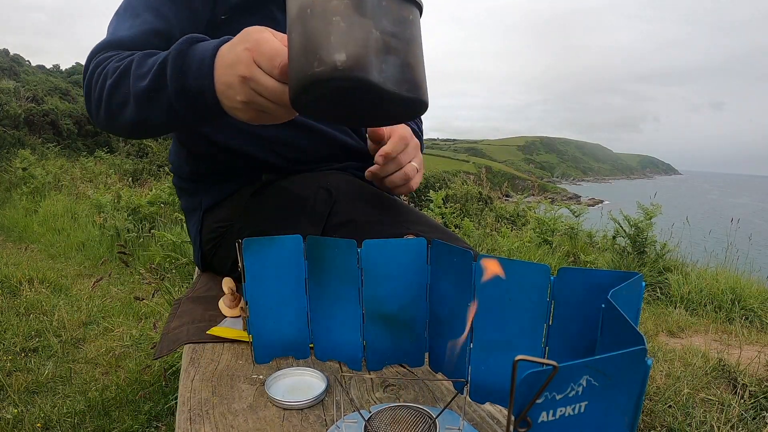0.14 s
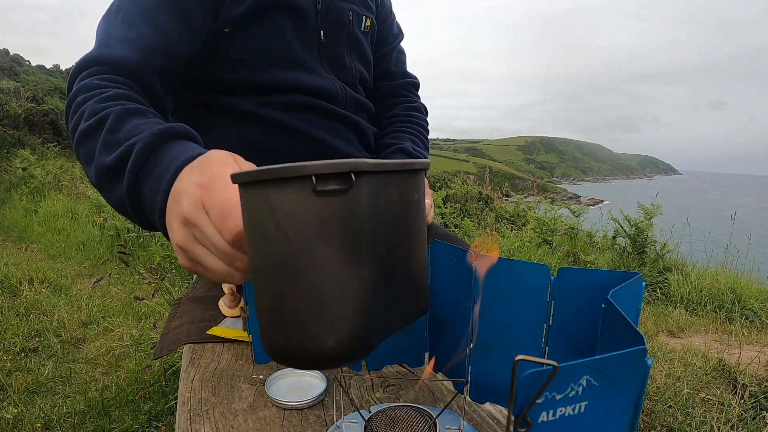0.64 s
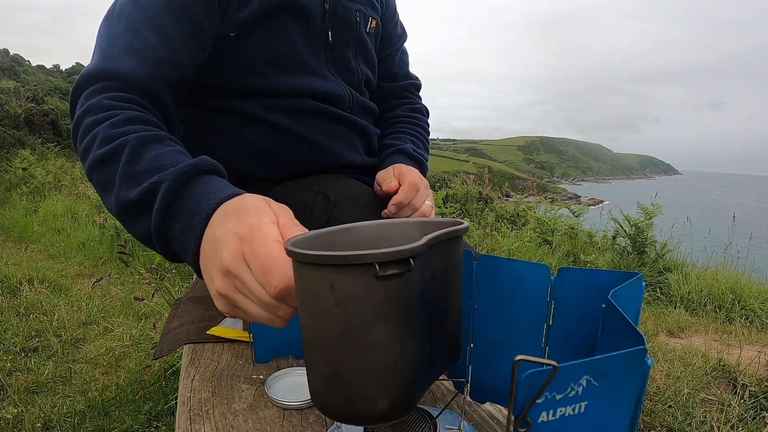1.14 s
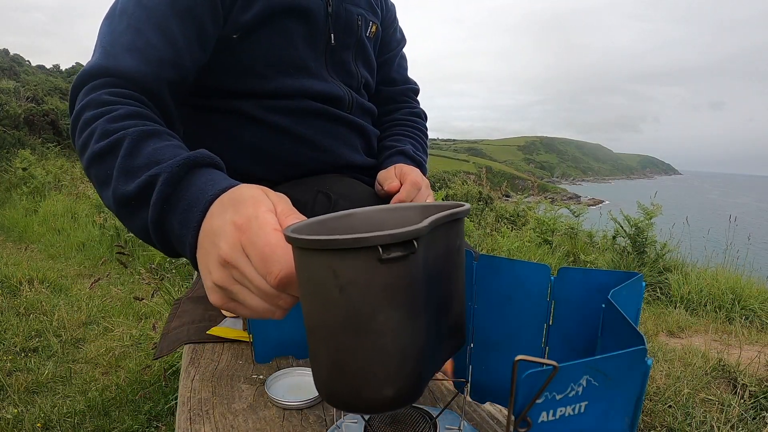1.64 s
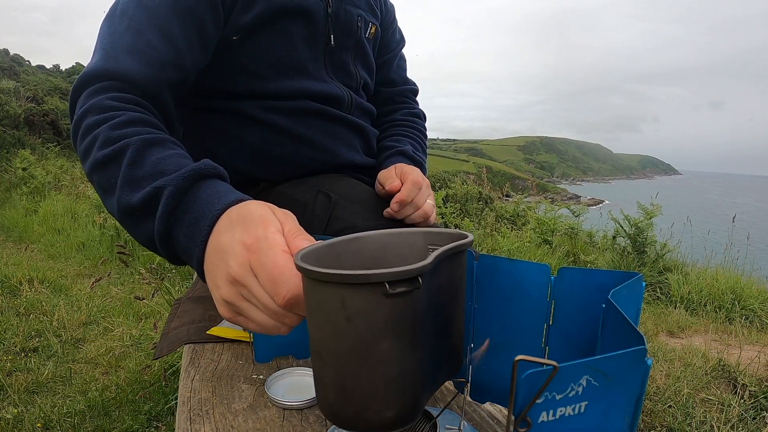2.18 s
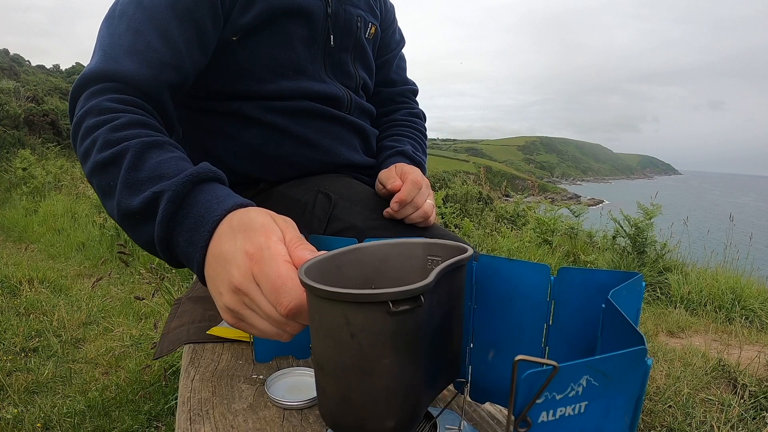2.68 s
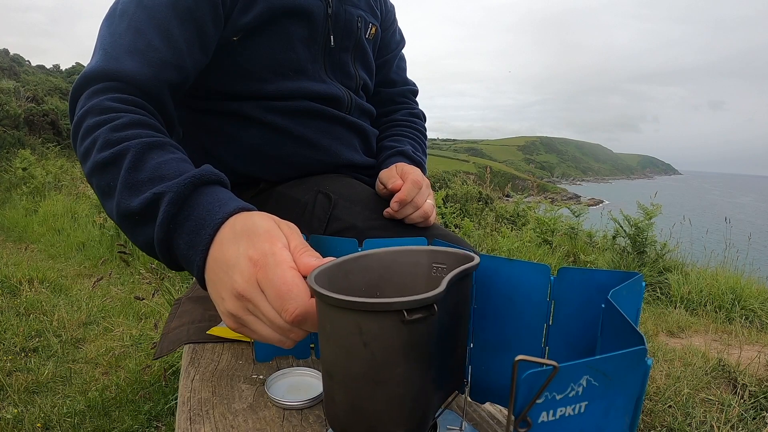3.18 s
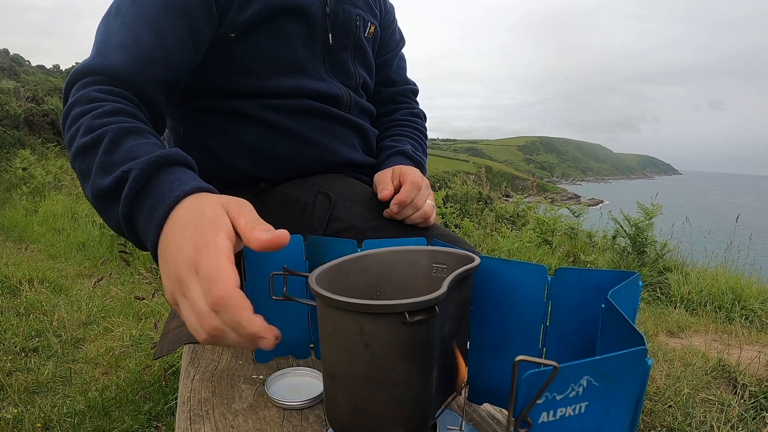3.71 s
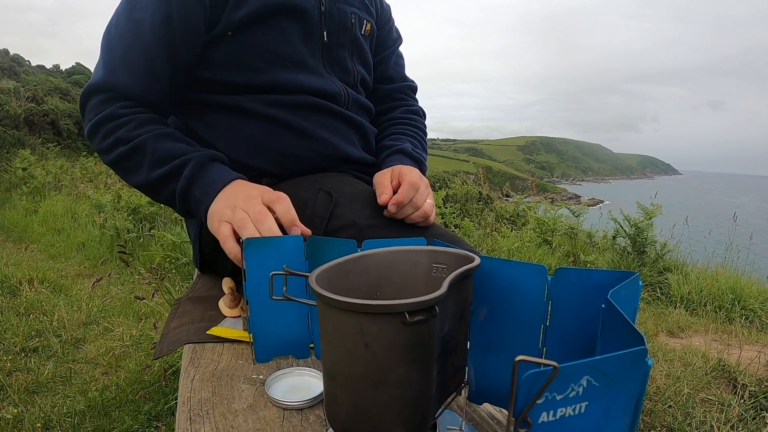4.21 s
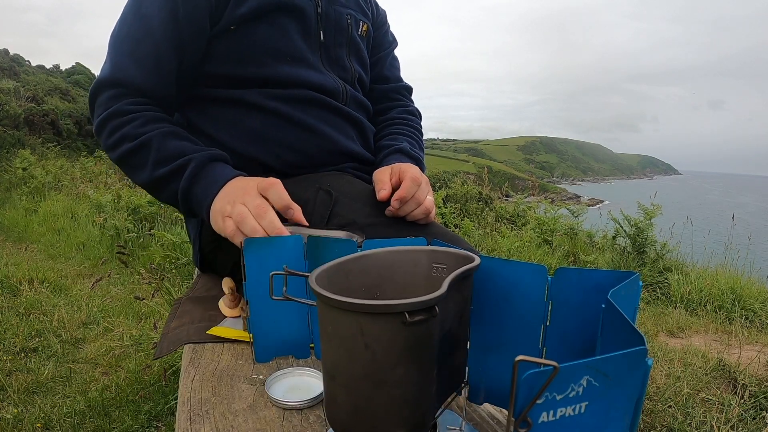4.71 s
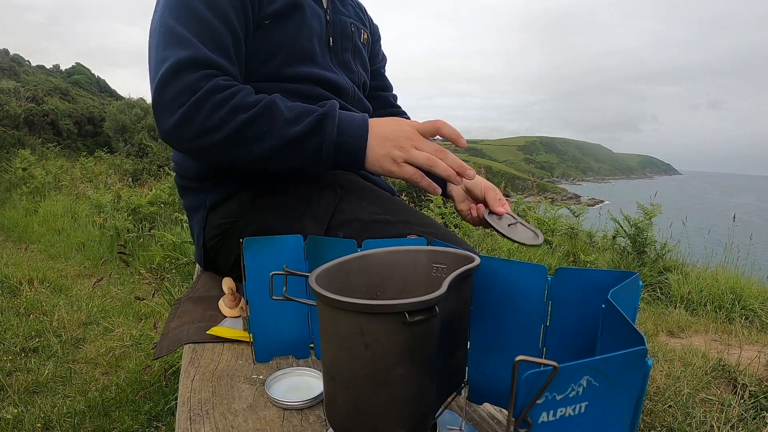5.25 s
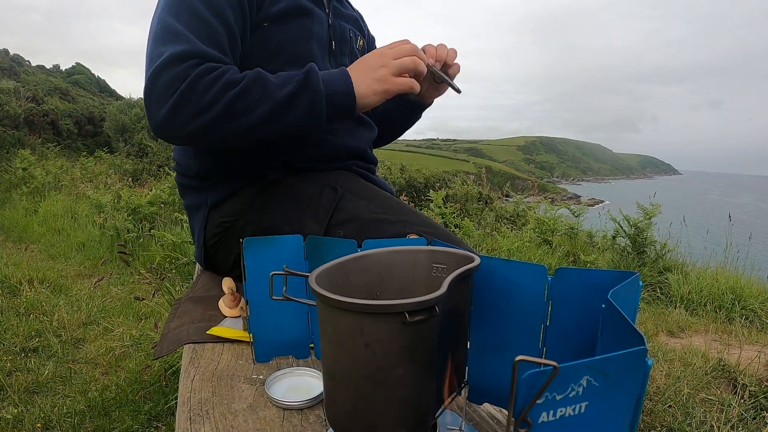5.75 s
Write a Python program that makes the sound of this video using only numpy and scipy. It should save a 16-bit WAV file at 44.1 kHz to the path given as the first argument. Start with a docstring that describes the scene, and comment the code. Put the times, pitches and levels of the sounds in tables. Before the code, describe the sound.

Outdoors on a cliff top, a small stereo microphone sits close to a camp stove. A steady soft flame roar with faint gas hiss and far surf runs throughout, quiet and slightly patchy. From 0.2 to 0.85 seconds a metal mug is lowered: short rising water gulps around 900 hertz, damped wire-handle ticks and grainy rubbing. From 1 to 3 seconds little happens beyond the burner, light low wind and thin gliding bird notes at 7 to 8 kilohertz, the last near 3.6. At 3.1 to 3.45 the mug ticks and scrapes dryly onto its supports. Wind surges briefly at 3.05, then from 3.5 onward buffets heavily in deep, uneven thumps, strongest near 3.75 and often heavier on the right. At 4.44 to 4.75 a thin lid clatters in a rapid, short-ringing cluster, the loudest metal event. Fingers hiss on it around 5.1 to 5.7, and a small clear nail tick of about 3 kilohertz comes at 5.79.

```python
"""A steel mug of water, close to the microphone, is lowered onto a gas stove on a grassy cliff top: air pockets
gulp, wire handles tick, and struck metal modes with chattering bounces make the scrape onto the supports.
Then a thin lid is picked up with a clatter, rubbed in the fingers (grainy hiss) and ticked with a nail.
Burner and far surf are patchy stereo noise, a small bird calls in gliding tones, and gusts of slow and
fast noise buffet the two microphone ports of a small camera."""
import sys
import numpy as np
from scipy import signal
from scipy.fft import rfft, irfft, next_fast_len
from scipy.io import wavfile
from scipy.ndimage import uniform_filter1d, map_coordinates

SR = 44100
rng = np.random.default_rng(int(sys.argv[2]) if len(sys.argv) > 2 else 0)


def transcribe(signal):
    """Save signal, clipped to [-1, 1], as a 16-bit WAV file at the path in sys.argv[1]."""
    frames = np.atleast_2d(signal).T
    limited = np.clip(frames, -1, 1)
    pcm = np.round(limited * 32767).astype(np.int16)
    wavfile.write(sys.argv[1], SR, pcm)


def makeup_ratio(level_db):
    """Linear amplitude ratio for a level in decibels (20 dB per factor of ten)."""
    decades = np.asarray(level_db, float) / 20
    return 10 ** decades


N = 258867
TIME = np.arange(N) / SR

# Burner and surf over time. Each row: time in seconds, relative roar level in dB, relative gas hiss level in dB.
HISS_LEVELS = [(0.0, -53, -68), (.6, -51.5, -68), (1.83, -51, -68.5), (5.87, -53, -69.5)]
# Spectra of the flame roar with surf, and of the gas jet. Each row: frequency in Hz, density in dB per Hz.
ROAR_SPECTRUM = [(71, -38), (120, -2.5), (210, -1), (350, -5.5), (400, -6.5), (436, -8.5), (484, -8),
                 (1560, -10.5), (4000, -26), (5200, -49.5), (8800, -120)]
GAS_SPECTRUM = [(1470, -12.5), (2500, -5), (2740, -4.5), (3360, -10), (3700, -10.5), (5070, -13.5),
                (5640, -14.5), (7850, -24.5), (8300, -28.5), (10800, -79.5), (18300, -120)]
# How alike the hiss is at both ports. Each row: frequency in Hz, likeness from 0 to 1.
HISS_LIKENESS = [(200, 0.957), (2000, 0.888), (4000, 0.99), (7000, 0.22)]
# Colour of the two ports. Each row: frequency in Hz, left over right in dB.
PORT_COLOUR = [(200, -0.93), (1500, -1.5), (2900, 0), (4000, -1), (5200, -3.5), (6900, -13), (7900, 1.5)]

# Bird notes. Each row: start in seconds, length in seconds, first and last pitch in Hz, level in dB.
BIRD_NOTES = [(0, 0.095, 8160, 7600, -75.5), (.37, 0.177, 7150, 7085, -79), (0.831, 0.103, 7500, 7510, -77),
              (0.952, 0.039, 8200, 7770, -69.5), (.99, 0.059, 7900, 7720, -69),
              (1.333, 0.07, 7250, 7250, -74), (1.399, 0.0376, 7350, 7540, -74.5),
              (1.715, 0.036, 7850, 7520, -67.5), (1.745, 0.031, 7850, 7250, -67),
              (1.774, .035, 7600, 7350, -73), (2.119, 0.11, 7160, 7000, -74),
              (2.469, 0.093, 7800, 7480, -73), (2.88, 0.091, 7820, 7597, -71.5),
              (2.971, 0.054, 7400, 7300, -73.5), (3.553, 0.133, 7060, 7100, -69.5)]

# Spectra of the slow and the fast eddies. Each row: frequency in Hz, density in dB per Hz.
SLOW_EDDIES = [(8.8, -33), (15, -2.5), (59, 1), (120, -11.5), (160, -35), (260, -120)]
FAST_EDDIES = [(65, -46.5), (110, 0), (174, -5.5), (339, -26), (420, -29), (550, -46), (920, -120)]
# Gusts on the ports. Each row: peak in seconds, time to sink by GUST_SINK_DB in seconds (at zero the gust is silent),
# slow eddies on the left and on the right port in dB, fast eddies on the exposed right port in dB.
GUST_PEAKS = [(.025, 0.09, -47.5, -58.5, -67.5), (.47, 0.36, -58, -62, -65.5),
              (1.71, 0.02, -44, -42, -71.5), (1.89, 0.09, -49.5, -54, -70),
              (2.06, .14, -46.5, -53.5, -66.5), (2.46, 0.0341, -48.5, -43, -70),
              (2.57, 0.0947, -42.5, -44, -67), (2.78, 0.0645, -42.5, -60, -64.5),
              (3.048, 0.0376, -21, -25.5, -37.5), (3.178, 0.1681, -45, -35.5, -54.5),
              (3.547, 0.0526, -26, -18.5, -33), (3.69, .08, -31.5, -31.5, -43),
              (3.734, 0.0822, -30.5, -25, -20.5), (3.78, 0.0605, -36.5, -14.5, -19.5),
              (3.881, 0.05, -33, -17.5, -26), (3.981, 0.1025, -24, -19, -31),
              (4.085, 0.12, -21.5, -21, -33), (4.195, 0.1814, -33.5, -34, -32),
              (4.315, 0.0655, -27, -19, -28.5), (4.395, 0.1367, -32, -31.5, -40),
              (4.595, 0.05, -43, -28.5, -42.5), (4.665, 0.0579, -26, -41.5, -58),
              (4.699, 0.0247, -49.5, -20.5, -32), (4.755, 0, -37, -53, -57.5),
              (4.819, 0.0937, -37.5, -23, -29), (4.885, 0.1166, -35, -18, -26),
              (4.953, 0.0551, -27.5, -22, -30), (5.103, 0.1, -39, -32.5, -54),
              (5.198, 0.0559, -25, -20, -37), (5.288, .09, -39.5, -45.5, -58.5),
              (5.373, .07, -49.5, -27, -37.5), (5.488, 0.06, -40.5, -54.5, -62),
              (5.652, 0.0735, -28.5, -18.5, -38), (5.737, 0.14, -30, -23, -29.5),
              (5.83, 0.0762, -30, -40.5, -59)]
# Breeze between the gusts, slow and fast eddies. Each row: time in seconds, level in dB.
BREEZE_SLOW = [(0, -75.5), (1.0, -69.5), (1.5, -73), (2.95, -68.5), (3.1, -59.5), (3.45, -62), (3.6, -37),
               (4.4, -40), (4.52, -53.5), (5.87, -50.5)]
BREEZE_FAST = [(0, -77.5), (2.95, -76), (3.5, -66.5), (5.87, -64.5)]

# Fingers and wire sliding on metal. Each row: start in seconds, length in seconds, first and last level in dB.
RUB_STROKES = [(.05, 0.218, -76, -68.5), (.245, .125, -62, -76), (0.361, 0.126, -60.5, -63),
               (0.492, 0.344, -73, -74), (0.798, 0.19, -74, -81.5), (3.184, .25, -67, -76),
               (3.428, 0.167, -68.5, -73), (4.59, .075, -55, -62), (5.095, 0.085, -62, -56),
               (5.164, 0.1593, -65.5, -71.5), (5.385, 0.053, -68, -71.5), (5.501, .18, -71, -73),
               (5.766, 0.061, -67.5, -72.5)]
# Spectrum of the rubbing. Each row: frequency in Hz, density in dB per Hz.
RUB_SPECTRUM = [(1500, -39.5), (3500, 3), (5000, 1), (7200, -1), (9000, -2), (14000, -7.5)]

# Contacts of mug, handles and supports, then of the lid. Each row: start in seconds, nominal peak in dB,
# favoured mode in Hz, contact time in seconds, brightness in dB per octave.
MUG_HITS = [(.2025, -50, 2730, 0.0056, 2), (.365, -47.5, 1900, 0.0058, 1.5), (.45, -42.5, 2320, 0.0039, -1),
            (.4665, -53.5, 6340, 0.0031, 0.5), (.5, -44, 2720, 0.0062, -3.5),
            (.545, -44, 2700, 0.0063, -3.5), (.6175, -39, 2750, 0.0053, -3.5),
            (.619, -43.5, 1362, 0.0048, -0.5), (.638, -52.5, 2730, .004, -2), (.75, -49, 2720, .006, -4),
            (.7885, -42, 2800, 0.0068, -1), (3.1215, -35, 5080, 0.0176, 0.5), (3.141, -38, 5080, .011, 3),
            (3.146, -37, 4400, 0.0059, 0), (3.1555, -36.5, 6700, .003, 0.5),
            (3.1575, -27.5, 2200, 0.0066, 1.5), (3.167, -40, 2050, 0.0054, 1.5),
            (3.333, -48, 4400, 0.0144, 1.5), (3.366, -33, 3050, 0.0032, -0.5),
            (3.378, -40, 1900, 0.0153, -1), (3.442, -41, 1900, 0.03, -2.5)]
LID_HITS = [(4.4432, -20, 1084, 0.00416, 2), (4.444, -20.5, 670, 0.0028, 1),
            (4.4535, -18.5, 646, 0.00723, 1.5), (4.454, -25, 3860, 0.005, 0), (4.508, -38, 2000, 0.0127, 1),
            (4.5215, -19.5, 501, 0.0038, .5), (4.522, -24, 2738, 0.0035, 0.5),
            (4.53, -25.5, 442, 0.0136, -0.5), (4.576, -17, 940, 0.00515, -1),
            (4.5775, -25.5, 2480, 0.004, -0.5), (4.5865, -19, 662, 0.0044, 0.5),
            (4.6285, -28.5, 661, 0.0148, -3), (4.6275, -34, 1834, 0.01205, -0.5),
            (4.686, -26, 2033, 0.0159, -2), (4.689, -28.5, 560, .005, -3), (4.702, -21, 590, 0.01945, -2.5),
            (4.7362, -19.5, 2738, .003, -1.5), (4.738, -29, 1375, .005, 0), (4.739, -30.5, 760, .01, 0)]
# Ringing modes of mug and lid. Each row: frequency in Hz, relative level in dB, 60 dB decay time in seconds.
MUG_MODES = [(1362, -13.5, 0.02), (1900, -2, 0.034), (2076, -1.5, 0.027), (2320, -2.5, 0.018),
             (2730, -3, 0.0187), (3378, -6.5, 0.044), (3860, -9, 0.04), (4400, -8, 0.022),
             (5080, -8.5, 0.021), (6340, -7.5, .02), (6750, -14, .02), (7300, -13.5, 0.02)]
LID_MODES = [(431, -7, 0.062), (491.8, -1, 0.065), (602.4, 5.5, 0.0407), (655.5, 5, 0.045),
             (760, 2, 0.0396), (1084, -5, .12), (1375, -10, 0.24), (1834, -6, .075), (2033, -5, .07),
             (2738, 3.5, 0.0325), (3050, -4, 0.036), (3236, -10.5, 0.109), (3510, -14, .14),
             (3860, -3, 0.05), (4270, -11.5, 0.11), (4640, -10, 0.09), (5000, -11, .06), (5550, -16.5, .06),
             (6294, -17, 0.07), (6620, -19, .05), (7196, -20, .06)]
# Noise of the blow itself. Each row: frequency in Hz, density in dB per Hz.
CRACK_SPECTRUM = [(300, -26.5), (500, 0), (1100, 1.5), (1600, -1.5), (2700, -1), (4000, -5.5), (7000, -16),
                  (14000, -20)]

# Water gulps. Each row: start in seconds, relative level in dB, starting pitch in Hz.
GULPS = [(0.204, -42, 960), (0.261, -48, 1003), (0.354, -47, 756), (0.366, -45, 853), (0.45, -37, 860),
         (0.502, -37, 852), (0.55, -42, 932), (0.618, -42.5, 1002), (0.642, -41, 914), (0.713, -48, 927),
         (0.731, -45, 900), (0.751, -41, 848), (0.785, -46.5, 905), (0.83, -47, 977)]
# A fingernail ticks the rim of the held lid. Each row: start in seconds, level in dB.
TINKS = [(5.7808, -42), (5.786, -31.5), (5.7935, -41)]
# Left port behind the right for the kit. Each row: frequency in Hz, lag in radians.
KIT_LAG = [(700, 0), (2000, 0.304), (4000, 1.07), (5200, 0.56), (6900, 0.034), (8000, 0.88)]
# Treble loss behind the port mesh. Each row: frequency in Hz, gain in dB.
MESH_LOSS = [(7300, 0), (8500, -8.5), (11000, -13), (14000, -28), (16500, -64)]


def unit(x):
    """Scaled to rms 1."""
    return x / np.sqrt(np.mean(x ** 2) + 1e-20)


def along(points, hz):
    """(Hz, value) points joined on a log frequency axis."""
    f, v = np.transpose(points)
    return np.interp(np.log(hz + 1), np.log(f + 1), v)


def curves(rows):
    """One value per sample for each column after the time."""
    s, *cols = np.transpose(rows)
    return [np.interp(TIME, s, c) for c in cols]


def wobble(rate):
    """A smooth random curve, rate knots a second."""
    return map_coordinates(rng.standard_normal(int(N * rate / SR) + 4), [TIME * rate])


def window(s, length, rise_s, fall_s):
    """A smooth gate from s to s + length."""
    ramp = np.minimum((TIME - s) / rise_s, (s + length - TIME) / fall_s)
    return np.sin(np.pi / 2 * np.clip(ramp, 0, 1)) ** 2


def filtered(x, response):
    """x times a complex response of frequency."""
    n = x.shape[-1]
    m = next_fast_len(n + 8192)
    return irfft(rfft(x, m) * response(np.fft.rfftfreq(m, 1 / SR)), m)[..., :n]


def noise(spectrum, channels=1):
    """Coloured noise of rms 1."""
    return unit(filtered(rng.standard_normal((channels, N)), lambda hz: makeup_ratio(along(spectrum, hz))))


def diffuse(spectrum, patchy_db):
    """Stereo noise in soft patches of time and frequency, partly alike at both ports."""
    z = signal.stft(rng.standard_normal((2, N)), nperseg=512)[2]
    field = uniform_filter1d(rng.standard_normal(z.shape[1:]), size=8, axis=0)
    field = uniform_filter1d(field, size=14, axis=1)
    pair = signal.istft(z * makeup_ratio(patchy_db * unit(field)), nperseg=512)[1][:, :N]

    def spread(hz):
        # this mid/side balance gives the wanted left-right correlation
        angle = np.arccos(np.clip(along(HISS_LIKENESS, hz), -1, 1)) / 2
        return makeup_ratio(along(spectrum, hz)) * np.array([np.cos(angle), np.sin(angle)])

    mid, side = filtered(pair, spread)
    return unit(np.array([mid + side, mid - side]))


def burner():
    """Flame roar with far surf, and the gas jet above it, both fluttering a little."""
    roar_db, gas_db = curves(HISS_LEVELS)
    roar_gain = makeup_ratio(roar_db + 2.5 + .5 * wobble(7))
    gas_gain = makeup_ratio(gas_db + 7.0 + 0.31 * wobble(12))
    roar = roar_gain * diffuse(ROAR_SPECTRUM, patchy_db=1.1347)
    return roar + gas_gain * diffuse(GAS_SPECTRUM, patchy_db=1.05)


def bird():
    """Thin high notes that waver as they glide, blurred by the bushes' echoes, which differ at each port."""
    edge_s, echo_db, echo_t60_s = 0.013, -2.5, .12
    out = np.zeros(N)
    for s, length, first_hz, last_hz, db in BIRD_NOTES:
        hz = np.interp(TIME, [s, s + length], [first_hz, last_hz])
        gain = window(s, length, edge_s, edge_s) * makeup_ratio(db + 3.84 * wobble(70))
        phase = 2 * np.pi * np.cumsum(hz + 80 * wobble(120)) / SR
        out += gain * np.sqrt(2) * np.sin(phase)
    t = np.arange(SR // 5) / SR
    tail = rng.standard_normal((2, len(t))) * makeup_ratio(-60 * t / echo_t60_s)
    echo = signal.fftconvolve(out[None], tail / np.linalg.norm(tail[0]), axes=1)[:, :N]
    return out + makeup_ratio(echo_db) * echo


GUST_SINK_DB = 21


def gusts():
    """Each gust swells to a rounded peak and sinks into the breeze; powers add to left, right and fast dB."""
    roundness, rise_over_fall, fast_over_slow = 1.392, 0.916, 0.786  # higher power: rounder top; time ratios
    step = np.arange(0, N / SR + .01, .002)
    s, span, *peak_db = np.transpose(GUST_PEAKS)[:, :, None]
    away = np.abs(step - s) / np.where(step < s, rise_over_fall * span, span)
    levels = []
    for db, brief, floor in zip(peak_db, [1, 1, fast_over_slow], [BREEZE_SLOW, BREEZE_SLOW, BREEZE_FAST]):
        gust_db = db - GUST_SINK_DB * (away / brief) ** roundness
        breeze_db = np.interp(step, *np.transpose(floor))
        power = np.sum(makeup_ratio(2 * gust_db), axis=0) + makeup_ratio(2 * breeze_db)
        levels.append(np.interp(TIME, step, 10 * np.log10(power)))
    return levels


def steady(x, span_s):
    """Noise with its own slow swells evened out."""
    return x / np.sqrt(np.abs(uniform_filter1d(x ** 2, round(span_s * SR))) + 0.044)


def wind():
    """Eddies hit each port on its own; fast eddies come in lumps and stand out in strong gusts."""
    left_db, right_db, fast_db = gusts()
    slow_db = np.array([left_db, right_db])
    # on the sheltered left port the fast eddies follow its slow ones
    fast_db = np.array([-42.5 + 1.045 * (left_db + 28.0), fast_db])
    lumps = np.array([wobble(30), wobble(30)])
    slow = steady(noise(SLOW_EDDIES, channels=2), span_s=0.095)
    fast = unit(makeup_ratio(2.0 * lumps) * steady(noise(FAST_EDDIES, channels=2), span_s=0.068))
    deep = filtered(slow, lambda hz: 1 / (1 + (hz / 45) ** 4))
    lull = makeup_ratio(np.clip(-.25 * (slow_db + 30.0), -6, 6))  # light wind rolls slower eddies
    slow = slow + (lull - 1) * deep
    return makeup_ratio(slow_db) * slow + makeup_ratio(fast_db) * fast


def rubbing():
    """Sliding skin and wire catch and slip: a hiss in clumps and grains, coloured by the metal's upper modes."""
    edge_s, ring_db, ring_width_hz = 0.0137, 4, 90
    level = np.zeros(N)
    for s, length, first_db, last_db in RUB_STROKES:
        stroke_db = np.interp(TIME, [s, s + length], [first_db, last_db])
        level += makeup_ratio(stroke_db) * window(s, length, edge_s, edge_s)
    grain = makeup_ratio(2 * wobble(45) + 3 * wobble(400))  # clumps and grains

    def metal(f):
        damping = 1j * f * ring_width_hz
        modes = LID_MODES[-8:] + MUG_MODES[-2:]
        return 1 + makeup_ratio(ring_db) * sum(damping / (hz ** 2 - f ** 2 + damping) for hz, _, _ in modes)

    return level * unit(filtered(grain * noise(RUB_SPECTRUM)[0], metal))


def struck(hits, modes, crack_db, favour_db, tail_s, low_hz):
    """A blow and its chatter of small bounces ring the modes; where it lands decides which mode is favoured."""
    blow_s, scrape_s = 3e-5, .011  # contacts longer than scrape_s start without a blow and swell
    chatter_at_10ms_db, chatter_per_doubling_db = 1, 7.5  # bounces over the first blow
    out, t = np.zeros(N + SR), np.arange(SR // 5) / SR
    hz, level_db, t60 = np.transpose(modes)[:, :, None]
    push = np.exp(-t[:SR // 200] / blow_s)  # the contact force takes a moment, so a ring starts without a click
    for s, db, favoured_hz, contact_s, tilt_db in hits:
        tilt = lambda f: tilt_db * np.log2(f / 1500 + .01)
        near = lambda f: np.exp(-(np.log2(f / favoured_hz + .01) / .2) ** 2)
        scatter_db = 2 * rng.standard_normal(hz.shape)
        strength = makeup_ratio(level_db + tilt(hz) + favour_db * near(hz) + scatter_db)
        held_hz = hz * (1 + .005 * rng.standard_normal(hz.shape))  # fingers detune the metal
        stroke = np.sum(strength * makeup_ratio(-60 * t / t60) * np.sin(2 * np.pi * held_hz * t), axis=0)
        span = max(contact_s, .001)
        chatter_db = chatter_at_10ms_db + chatter_per_doubling_db * np.log2(100 * span)
        # bounces: spiky noise that keeps up for the contact, then stops
        bounces = rng.laplace(size=len(t)) * np.exp(-(t / span) ** 4)
        force = makeup_ratio(chatter_db) * bounces / np.sqrt(2 * span * SR)
        scrape = span > scrape_s
        force *= 1 - scrape * np.exp(-t / (.06 * span))
        force[0] = 1 - scrape
        ring = signal.fftconvolve(np.convolve(force, push), stroke)[:len(t)]
        # the countless small modes of thin metal merge into a noise that each bounce feeds
        fed = np.abs(signal.fftconvolve(force ** 2, makeup_ratio(-120 * t / tail_s))[:len(t)])
        grit = rng.standard_normal(len(t)) * np.sqrt(fed)
        colour = lambda f: makeup_ratio(along(CRACK_SPECTRUM, f) + tilt(f) + favour_db / 2 * near(f))
        crack = filtered(grit, colour)
        # from nominal peak to rms
        out[round(s * SR):][:len(t)] += makeup_ratio(db - 16) * unit(unit(ring) + makeup_ratio(crack_db) * unit(crack))
    # too small to radiate bass
    return filtered(out[:N], lambda f: (1j * f / low_hz / (1 + 1j * f / low_hz)) ** 4)


def water():
    """Air pockets gulp in the sloshing water: short damped tones that rise."""
    t60_s, onset_s = 0.0268, 0.00112
    out, t = np.zeros(N + SR), np.arange(SR // 20) / SR
    for s, db, hz in GULPS:
        tone = np.sin(2 * np.pi * hz * t * (1 + 8 * t))
        out[round(s * SR):][:len(t)] += makeup_ratio(db + 7.5 - 60 * t / t60_s) * (1 - np.exp(-t / onset_s)) * tone
    return out[:N]


def tinks():
    """Each light tick rings only the one mode that the fingers leave free."""
    mode_hz, t60_s = 3003, 0.0286
    out, t = np.zeros(N + SR), np.arange(SR // 20) / SR
    for s, db in TINKS:
        hz = mode_hz * (1 + 0.0095 * rng.standard_normal())
        decay = makeup_ratio(db - 60 * t / t60_s) * (1 - np.exp(-t * mode_hz))
        out[round(s * SR):][:len(t)] += decay * np.sin(2 * np.pi * hz * t)
    return out[:N]


def nearby(x, echo_db):
    """Board and wind shield send back short, treble-weighted echoes, different at each port."""
    t = np.arange(SR // 30) / SR
    tail = rng.standard_normal((2, len(t))) * makeup_ratio(-60 * t / 0.013)
    echo = signal.fftconvolve(x[None], tail / np.linalg.norm(tail[0]), axes=1)[:, :N]
    return x + makeup_ratio(echo_db) * filtered(echo, lambda f: f ** 2 / (f ** 2 + 3500 ** 2))


def ports(x, radians):
    """A sound reaches the left port later; each port has its colour."""
    side = np.array([[.5], [-.5]])
    return filtered(x, lambda hz: makeup_ratio(side * along(PORT_COLOUR, hz)) * np.exp(-1j * side * radians(hz)))


def scene():
    """Kit close in front, hiss and bird to one side, wind on the ports."""
    far = ports(burner(), lambda hz: 2 * np.pi * hz * 6.5e-5)  # left port late by 65 microseconds
    far = far + ports(bird(), lambda hz: 2 * np.pi * hz * 2e-5)
    mug = struck(MUG_HITS, MUG_MODES, crack_db=4, favour_db=13.5, tail_s=0.0306, low_hz=787)
    lid = struck(LID_HITS, LID_MODES, crack_db=-7, favour_db=15, tail_s=.052, low_hz=300)
    handled = nearby(mug + lid + tinks() + water() + rubbing(), echo_db=0)
    kit = ports(handled, lambda hz: along(KIT_LAG, hz))
    return kit + far + wind()


def roll_off(x):
    """The treble ends steeply here."""
    return signal.sosfilt(signal.butter(12, 15500, fs=SR, output="sos"), x)


def record(dry):
    """The mesh over the microphone ports dulls the treble."""
    padded = np.pad(dry, ((0, 0), (256, 256)), "reflect")
    heard = filtered(padded, lambda hz: makeup_ratio(along(MESH_LOSS, hz)))[:, 256:-256]
    return roll_off(heard)


dry = scene()
out = record(dry)
transcribe(out)
```